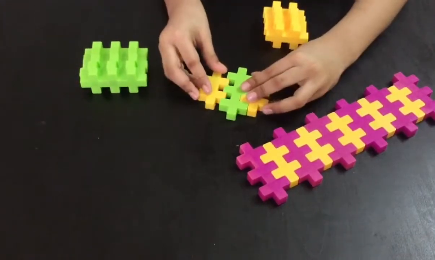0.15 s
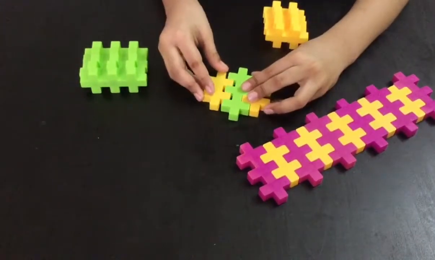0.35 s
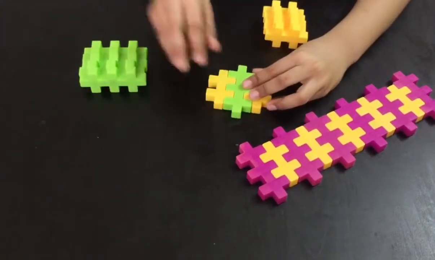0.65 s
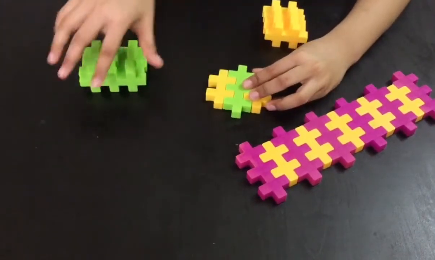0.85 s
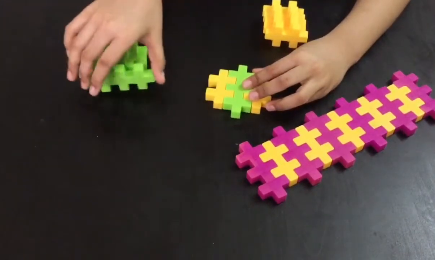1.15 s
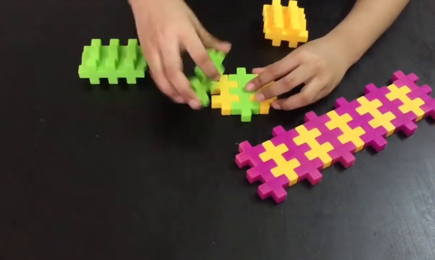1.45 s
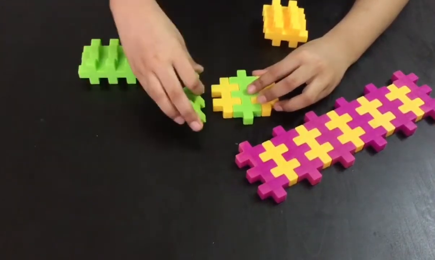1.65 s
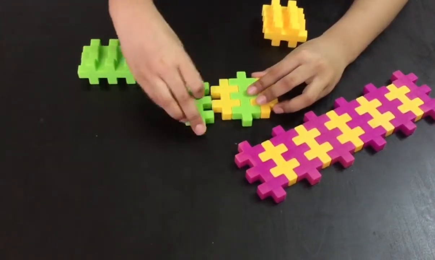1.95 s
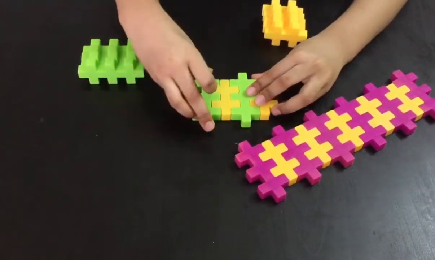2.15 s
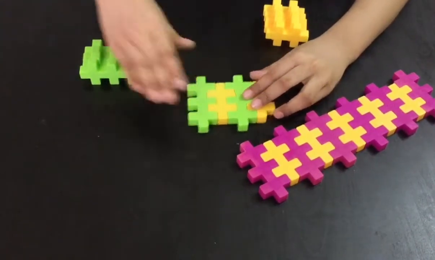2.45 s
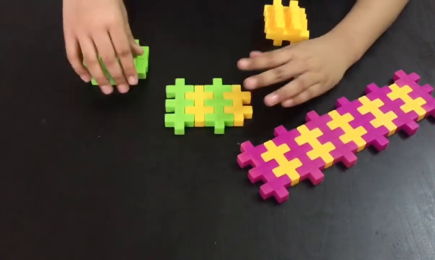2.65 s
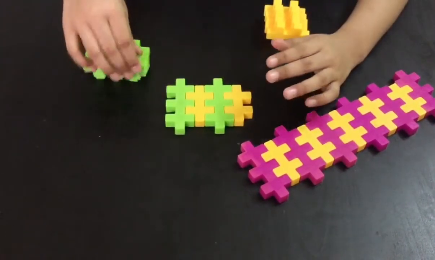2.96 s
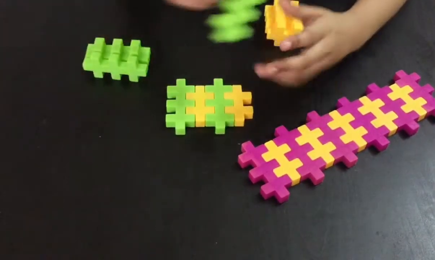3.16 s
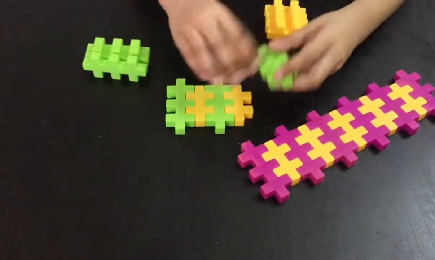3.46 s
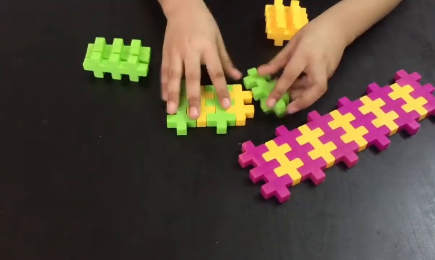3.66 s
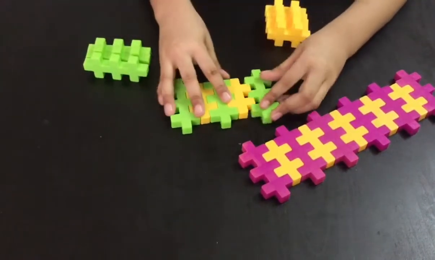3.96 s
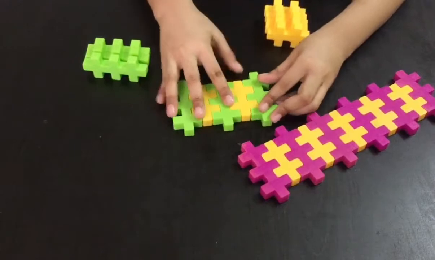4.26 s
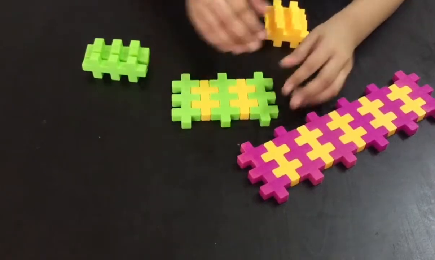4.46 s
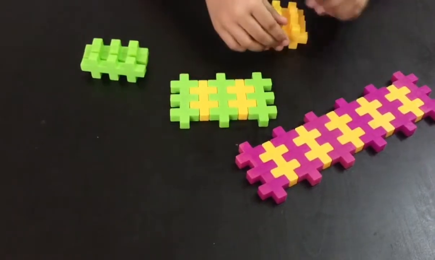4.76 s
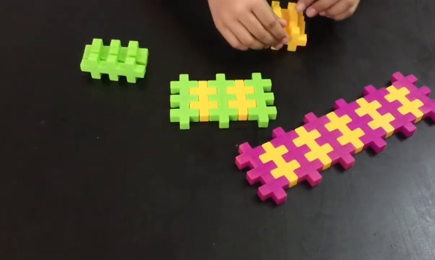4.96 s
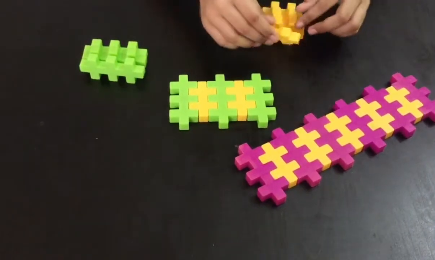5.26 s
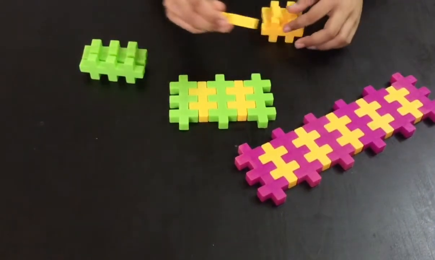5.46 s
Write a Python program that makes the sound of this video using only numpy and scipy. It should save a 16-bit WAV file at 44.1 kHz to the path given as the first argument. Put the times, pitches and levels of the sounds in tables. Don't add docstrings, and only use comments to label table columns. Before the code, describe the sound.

Close view of hands joining small hollow plastic blocks on a wooden table in a small bare room. Faint scuffs and touches come first, a low fridge-like hum starts, then clusters of clacks and scrapes, a soft wrist thump, the loudest double snap, and lighter taps. Slight microphone hiss throughout.

```python
import sys
import numpy as np
from scipy import signal
from scipy.fft import rfft, irfft, next_fast_len
from scipy.io import wavfile
from scipy.ndimage import uniform_filter1d

SR = 44100
rng = np.random.default_rng(int(sys.argv[2]) if len(sys.argv) > 2 else 0)


def decibels_to_gain(level_db):
    exponent = np.asarray(level_db, float) / 20
    return 10 ** exponent


def dump(signal):
    limited = np.clip(np.atleast_2d(signal).T, -1, 1)
    pcm = np.round(limited * 32767).astype(np.int16)
    wavfile.write(sys.argv[1], SR, pcm)


N = 247401
ON_S, CUT_S, THUMP_S = .752, 5.5938, 3.402
SHAFT_HZ, MAINS_HZ = 58.25, 119.97

# (frequency [Hz], level [dB per Hz])
RUMBLE = [(18, -16.5), (32, -13), (55, -6.5), (80, 1), (98, -7.5), (118, 1.5), (150, -0.5), (200, -10)]
# (frequency [Hz], level [dB per Hz])
HISS = [(400, -17), (700, -21), (1000, -20), (3000, -24), (8000, -30), (16000, -34.5)]
# (delay [ms], level [dB])
ECHOES = [(8.4, -23.5), (13.5, -23), (17.5, -29), (23, -29)]
# (frequency [Hz], t60 [s])
REVERBERATION = [(200, 0.38), (1000, 0.55), (3500, 0.35), (12000, 0.31)]
# (centre [Hz], width [Hz], level [dB])
HOUSING_DIPS = [(4830, 120, -5.5), (10400, 220, -5.5)]
# (multiple of shaft speed, level [dB rms])
PISTON_ORDERS = [(1, -49.5), (2, -51.5), (3, -70.5), (4, -72.5)]
# (frequency [Hz], level [dB], t60 [s])
WRIST_MODES = [(70, -42, 0.091), (149, -61, .05), (294, -47, 0.038)]

# (frequency [Hz], width [Hz], level [dB])
TABLE_TOP = [(185, 350, -5), (313, 210, 0.5), (415.5, 24, 5.5), (553, 57, 1)]
# (frequency [Hz], width [Hz], level [dB])
JOINED_STRUCK = [(900, 80, 7), (1340, 200, 5), (1800, 31, 8.5), (2516, 320, 8), (3900, 3700, -3.5)]
# (frequency [Hz], width [Hz], level [dB])
JOINED_DRAGGED = [(640, 160, -1), (900, 134, 8), (1400, 170, 0.5), (1825, 500, 4), (2810, 580, -7)]
# (frequency [Hz], width [Hz], level [dB])
STUD_WALLS = [(5430, 520, 0), (6620, 900, 4.5)]
# (frequency [Hz], width [Hz], level [dB])
SHARP_EDGES = [(8700, 1800, -1), (12000, 2500, -3), (15000, 3000, -4)]
# (frequency [Hz], width [Hz], level [dB])
FINGER_PADS = [(8700, 1700, -5), (13110, 2900, -2.5), (14800, 2200, -7)]
# (low mode [Hz], high mode [Hz], high mode level [dB])
ROW, PIECE, STACK = (900, 1570, -0.68), (935, 1730, 3.2), (1240, 2020, -2.5)
# (wall mode [Hz], upper ring level [dB])
WALL, STUD = (2890, -12), (4100, -3.5)

# (peak time [s], rise [s], fall [s], scrape level [dB], table rumble level [dB])
ROW_DRAGS = [(.44, 0.039, 0.042, -53.5, -53.5), (2.072, .004, 0.17, -47.5, -78),
             (2.41, 0.051, 0.05, -45, -52), (4.078, 0.027, .07, -41.5, -64),
             (4.38, 0.033, 0.083, -52.5, -53), (4.43, 0.038, 0.084, -46.5, -50)]
# (peak time [s], rise [s], fall [s], scrape level [dB], table rumble level [dB])
PIECE_DRAGS = [(1.396, 0.058, 0.12, -51, -69), (1.468, 0.069, 0.1, -52.5, -65),
               (1.556, 0.037, 0.0025, -54.5, -58), (1.982, 0.063, .014, -37.5, -46.5)]
# (peak time [s], rise [s], fall [s], scrape level [dB], table rumble level [dB])
STACK_DRAGS = [(1.054, 0.015, 0.097, -38.5, -82), (1.072, 0.021, 0.14, -43.5, -65.5),
               (1.842, 0.047, 0.0091, -39, -50), (2.045, 0.18, .004, -46, -67),
               (2.73, .004, 0.11, -50, -49), (2.82, 0.0034, 0.21, -57.5, -59),
               (2.905, 0.0077, 0.042, -52, -49), (3.624, 0.028, 0.0028, -58.5, -66),
               (5.5, 0.013, 0.054, -54, -57.5), (5.586, 0.03, .004, -52, -54.5)]
# (peak time [s], rise [s], fall [s], scrape level [dB], table rumble level [dB])
JOINED_DRAGS = [(2.492, 0.032, 0.21, -42.5, -69), (2.575, 0.13, 0.21, -38.5, -43),
                (4.322, 0.056, 0.094, -45.5, -51)]
# (peak time [s], rise [s], fall [s], wall rasp level [dB], finger hiss level [dB])
WALL_RUBS = [(1.07, 0.033, 0.04, -44.5, -72), (1.46, .2, .1, -96, -77), (1.832, 0.029, 0.0045, -36, -57),
             (1.848, .015, 0.0063, -37, -62), (1.93, .004, 0.076, -58.5, -68),
             (1.984, 0.028, 0.01, -37, -61), (2.04, .04, .004, -61, -78), (2.16, 0.58, 0.058, -57, -68.5),
             (2.405, 0.14, 0.075, -63.5, -76), (2.515, 0.057, 0.25, -54.5, -62.5),
             (2.575, 0.069, 0.14, -47.5, -64.5), (2.73, 0.012, 0.03, -48.5, -91),
             (2.78, .03, 0.09, -56, -83), (3.624, 0.05, 0.002, -64, -72), (4.074, .05, 0.091, -55.5, -62),
             (4.32, 0.058, 0.074, -51.5, -68.5), (4.436, .1, 0.16, -64, -84),
             (5.588, .02, 0.0039, -54, -67)]
# (peak time [s], rise [s], fall [s], stud rasp level [dB], finger hiss level [dB])
STUD_RUBS = [(1.54, 0.025, 0.019, -57.5, -58), (2.82, .004, 0.11, -52.5, -86), (2.902, .01, 0.03, -58, -83),
             (3.314, .05, 0.053, -70.5, -74), (3.49, 0.074, .013, -63, -71), (4.51, .06, .07, -61.5, -69)]

# (time [s], peak level [dB], wall ring [Hz], table knock [dB], brightness [dB])
TAPS = [(.004, -57.5, 4000, -27, -21), (0.4172, -52, 1420, -23, -26), (0.566, -55, 2660, -11, -14),
        (0.716, -42, 1040, -18, -5.5), (2.148, -42, 1860, -34, -10), (2.407, -44, 1580, -28, -24),
        (2.634, -36.5, 1780, -17, -38), (2.68, -43.5, 3240, -7, -29), (2.723, -40, 3870, -19, -32),
        (2.798, -40, 3730, -27, -26), (2.9038, -35.5, 2950, -7.5, -39), (2.918, -51, 575, -17.5, -30),
        (4.378, -40.5, 1483, -14, -29), (4.8021, -42.5, 3820, -37, -35), (4.874, -62, 1200, -10, -22),
        (4.8857, -47.5, 3140, -16, -19), (5.105, -60, 900, -3.5, -27), (5.5, -56, 2300, -31, -20.5)]
# (time [s], peak level [dB], wall ring [Hz], table knock [dB], brightness [dB])
STUD_KNOCKS = [(2.7173, -36, 2450, -25, -7), (2.8038, -33.5, 3860, -28, -2), (3.5365, -66.5, 810, -9.5, 11),
               (3.954, -34.5, 1980, -7.5, -7), (4.1905, -43.5, 3420, -10, -2), (4.191, -45, 1070, -16, -20),
               (5.0869, -41, 3590, -25, -4.5), (5.4825, -31.5, 3010, -31, -12)]
# (time [s], peak level [dB],
# wall ring [Hz], table knock [dB], brightness [dB])
TICKS = [(1.6215, -28.5, 1660, -14, -37.5), (2.591, -40.5, 2000, -29, -20),
         (3.6273, -7.5, 3900, -33, -30.5), (3.6282, -15, 2440, -25.5, -32.5),
         (3.6292, -21.5, 1800, -14.5, -36.5), (3.6355, -22, 1960, -19, -18.5),
         (3.748, -20.5, 3780, -16.5, -10.5), (3.7538, -14, 4100, -28.5, -10.5),
         (3.7803, -13.5, 2566, -25.5, -23), (5.5895, -38.5, 1400, -24, -29.5),
         (5.5929, -26, 3430, -3.5, -33)]
# (time [s], peak level [dB])
LANDINGS = [
    (1.5587, -27),
    (1.631, -28),
    (3.7715, -39),
    (4.42, -46.5),
    (5.49, -48.5),
]
# (wall ring [Hz], table knock [dB], brightness [dB])
LANDING_COLOUR = (1000, -13, -26)
# (time [s], peak level [dB], wall ring [Hz], table knock [dB], brightness [dB])
SNAPS = [(.433, -49.5, 1400, 3, -24.5), (1.5568, -17, 1670, -13, -17), (1.6278, -19, 2310, -17, -20.5),
         (1.8495, -13.5, 2842, -23.5, -14.5), (1.853, -16.5, 2500, -64, -2.5),
         (1.863, -22, 2560, -37, -19.5), (1.881, -28, 2520, -35, -18.5), (1.985, -27, 1490, -7.5, -14.5),
         (2.049, -34.5, 2600, -10, -6.5), (2.052, -26.5, 1190, -30, -5), (3.7666, -6, 3900, -20, -2.5),
         (3.769, -17.5, 2420, -19.5, -19)]


def unit(x):
    return x / np.sqrt(np.mean(x ** 2) + 1e-20)


def peak1(x):
    return x / np.max(np.abs(x))


def along(points, hz):
    point_hz, value = np.transpose(points)
    return np.interp(np.log(hz + 1), np.log(point_hz + 1), value)


def filtered(x, response):
    n = x.shape[-1]
    size = next_fast_len(n + 4096)
    return irfft(rfft(x, size) * response(np.fft.rfftfreq(size, 1 / SR)), size)[..., :n]


def resonant(x, modes):
    def response(hz):
        total = 0
        for k, (centre, width, db) in enumerate(modes):
            damping = 1j * hz * width
            total = total + (-1) ** k * decibels_to_gain(db) * damping / (centre * centre - hz * hz + damping)
        return total
    return filtered(x, response)


def twice(x, modes, spread):
    low, high = modes[0][0], modes[-1][0]
    broad = (np.sqrt(low * high), high - low + spread * low, 0)
    return resonant(resonant(x, modes), [broad])


def roomed(x, source, wet_db):
    hz, t, spectrum = signal.stft(rng.standard_normal(SR // 2), SR, nperseg=256)
    decay = decibels_to_gain(-60 * t / along(REVERBERATION, hz)[:, None])
    tail = signal.istft(spectrum * decay, SR, nperseg=256)[1][:SR // 2]
    build_s = .009
    tail = tail * np.clip(np.arange(len(tail)) / SR / build_s - .3, 0, 1)
    early = np.zeros(len(tail))
    early[0] = 1
    for ms, db in ECHOES:
        early[round(ms * SR / 1000)] = decibels_to_gain(db + rng.normal(0, 0.69))
    diffuse = signal.fftconvolve(source, tail / np.linalg.norm(tail))
    return signal.fftconvolve(x, early) + decibels_to_gain(wet_db) * diffuse


def air():
    def response(hz):
        return decibels_to_gain(along(RUMBLE + HISS, hz)) * (hz < 15800)
    return decibels_to_gain(-65.5) * unit(filtered(rng.standard_normal(N), response))


def compressor():
    t = np.arange(N) / SR
    shaft = 2 * np.pi * SHAFT_HZ * (t + .00467)
    field = 2 * np.pi * MAINS_HZ * (t + .0003)
    lean = 1.15
    piston = sum(decibels_to_gain(db) * np.cos(k * shaft + lean) for k, db in PISTON_ORDERS)
    buzz = decibels_to_gain(-62.0) * np.cos(field) + decibels_to_gain(-77.5) * np.cos(2 * shaft + field + lean)
    fan = decibels_to_gain(-69) * np.cos(2 * np.pi * 78.06 * t)
    casing = decibels_to_gain(-68) * unit(resonant(rng.standard_normal(N), [(75, 30, -3), (160, 50, 0)]))
    surge = 1 + 0.14 * np.exp(-np.abs(t - ON_S) / 0.066)
    start = np.clip((t - ON_S) / 0.025, 0, 1) * surge
    return start * (np.sqrt(2) * (piston + buzz + fan) + casing)


def wrist():
    t = np.maximum(np.arange(N) / SR - THUMP_S, 0)
    return sum(decibels_to_gain(db - 60 * t / t60) * np.sin(2 * np.pi * hz * t) for hz, db, t60 in WRIST_MODES)


def strokes(table, bodies):
    swell_db, roundness = 32.5, 1.476
    out = np.zeros(N + 2 * SR)
    for s, rise, fall, *levels in table:
        n = np.arange(-round(min(rise, .4) * SR), round(min(fall, .4) * SR) + 1)
        chance = rng.standard_normal((5, SR))[:, SR // 2 + n]
        away = np.abs(n) / SR / np.where(n < 0, rise, fall)
        swell = decibels_to_gain(-swell_db * away ** roundness) * np.clip(10 * (1 - away), 0, 1)
        grip = decibels_to_gain(2.2 * unit(uniform_filter1d(chance[0], size=110)))
        rub = 0
        for j, (db, body) in enumerate(zip(levels, bodies)):
            own = decibels_to_gain(1.8 * unit(uniform_filter1d(chance[1 + j], size=260)))
            grains = chance[3 + j] * grip * own
            rings = sum((-1) ** k * twice(grains, [mode], 0.56) for k, mode in enumerate(body))
            rub = rub + decibels_to_gain(db - 4.0) * swell * unit(rings)
        rub = roomed(rub, rub, wet_db=-16)
        out[round(s * SR) + n[0]:][:len(rub)] += rub
    return out[:N]


def drags():
    total = strokes(JOINED_DRAGS, (JOINED_DRAGGED, TABLE_TOP))
    for table, (low_hz, high_hz, db) in [(ROW_DRAGS, ROW), (PIECE_DRAGS, PIECE), (STACK_DRAGS, STACK)]:
        cavity = [(low_hz, .13 * low_hz, 0), (high_hz, 0.1 * high_hz, db)]
        total = total + strokes(table, (cavity, TABLE_TOP))
    return total


def rubs():
    total = 0
    for table, (hz, db) in [(WALL_RUBS, WALL), (STUD_RUBS, STUD)]:
        wall = [(hz, .3 * hz, 0), (1.5 * hz, 0.5 * hz, -8), (6500, 1200, db)]
        total = total + strokes(table, (wall, FINGER_PADS))
    return total


def contacts(table, rise_ms, chatter_ms, first_blow, damping, wet_db):
    out, t = np.zeros(N + 2 * SR), np.arange(2048) / SR
    blow = (t == 0) * 1.
    envelope = np.minimum(t * 1000 / rise_ms, 1) * np.exp(-(t * 1000 / chatter_ms))
    for s, db, ring_hz, knock_db, upper_db, crack_db in table:
        chatter = rng.standard_normal((2, len(t))) * envelope
        force = first_blow * blow + chatter[0]
        shake_db = -6 + 0.07 * db

        def wall(f):
            ring = twice(f, [(ring_hz, damping * ring_hz, 0)], 0.86)
            return filtered(ring, lambda hz: 1 / (1 + 1j * hz / (1.8 * ring_hz)) ** 2)

        parts = [(0, force, wall),
                 (shake_db, force, lambda f: twice(f, JOINED_STRUCK, 0.94)),
                 (knock_db, force, lambda f: twice(f, TABLE_TOP, 0.85)),
                 (upper_db, chatter[1], lambda f: twice(f, STUD_WALLS, 0.19)),
                 (crack_db, chatter[1], lambda f: twice(f, SHARP_EDGES, 0.31))]
        hit = power = 0
        for rel_db, drive, body in parts:
            near = decibels_to_gain(db + rel_db) * peak1(body(drive))
            clean = body(blow)
            hit = hit + near
            power = power + np.abs(rfft(clean)) ** 2 * np.sum(near ** 2) / np.sum(clean ** 2)
        even = np.sqrt(np.abs(uniform_filter1d(power, size=61)))
        mean = np.roll(irfft(even), 150)
        hit = roomed(hit, mean + .25 * hit, wet_db)
        out[round(s * SR):][:len(hit)] += hit
    return out[:N]


def edged(rows, edge_db):
    return [(*row, row[-1] + edge_db) for row in rows]


def ticks():
    table = edged(TICKS + TAPS, -3) + edged(STUD_KNOCKS, -20)
    return contacts(table, rise_ms=.2, chatter_ms=.9, first_blow=2.0, damping=.3, wet_db=-10.5)


def snaps():
    landings = [(*row, *LANDING_COLOUR) for row in LANDINGS]
    table = edged(SNAPS + landings, -1.5)
    return contacts(table, rise_ms=.6, chatter_ms=2.0, first_blow=1.0, damping=0.29, wet_db=-9.5)


def scene():
    before = np.clip((CUT_S - np.arange(N) / SR) / 0.000271, 0, 1)
    sources = compressor() + wrist() + drags() + rubs() + ticks() + snaps()
    return (air() + sources * before)[None]


def roll_off(x):
    return signal.sosfilt(signal.butter(12, 17080, fs=SR, output="sos"), x)


def record(dry):
    def housing(hz):
        dips_db = sum(db * np.exp(-((hz - centre) / width) ** 2) for centre, width, db in HOUSING_DIPS)
        return decibels_to_gain(dips_db) * (hz < 16700)
    mix = filtered(dry, housing)
    return roll_off(mix)


dry = scene()
out = record(dry)
dump(out)
```